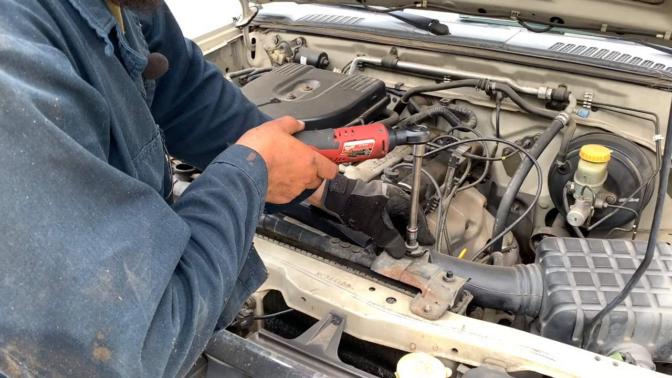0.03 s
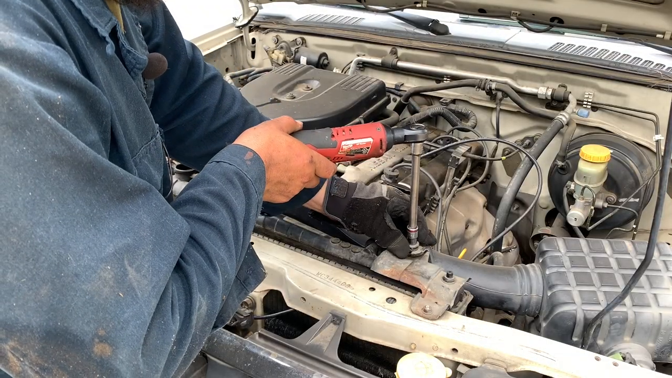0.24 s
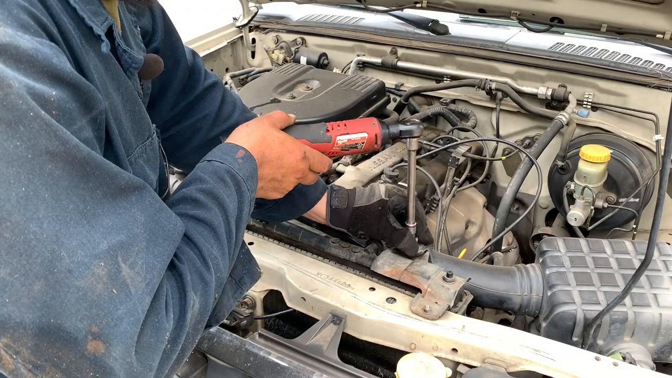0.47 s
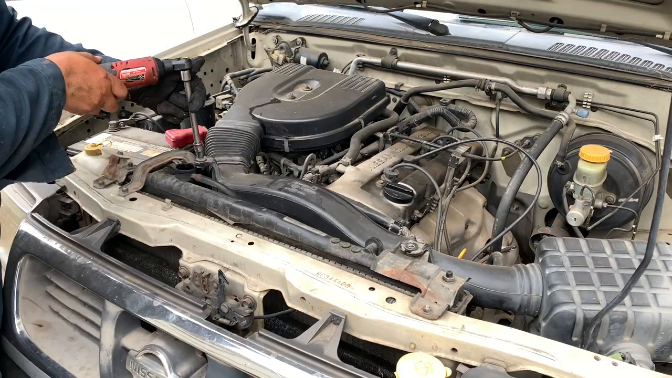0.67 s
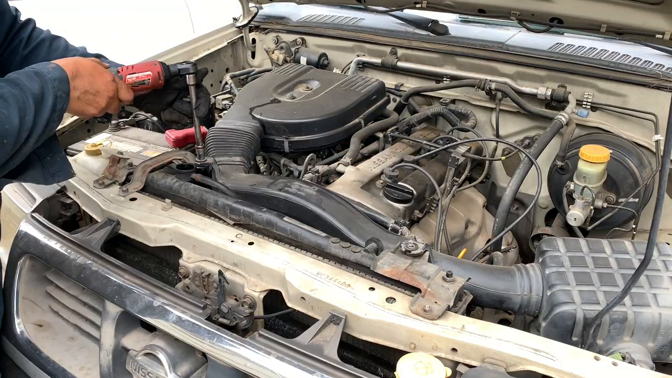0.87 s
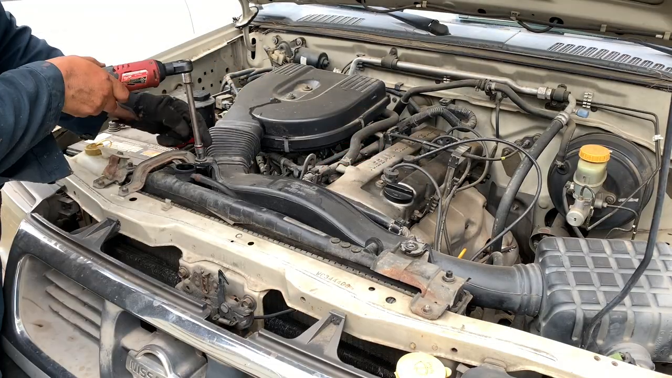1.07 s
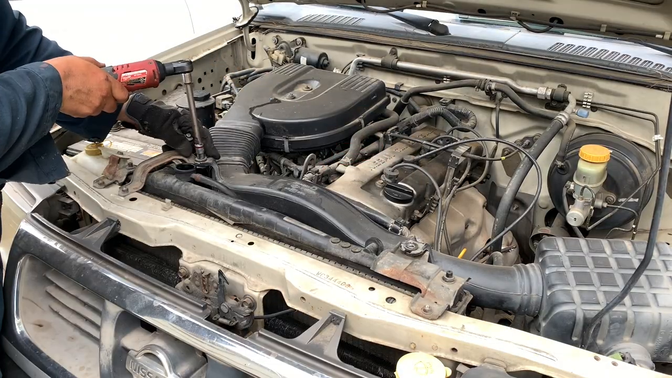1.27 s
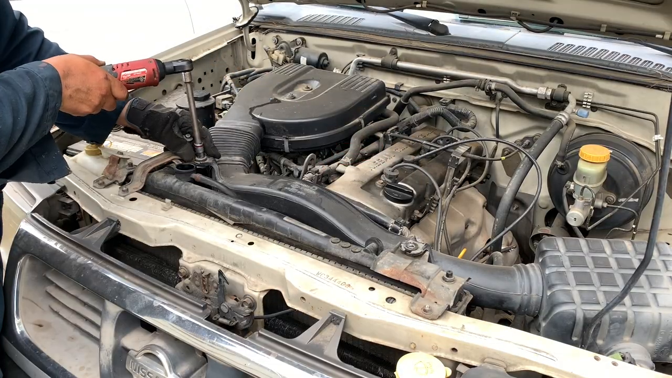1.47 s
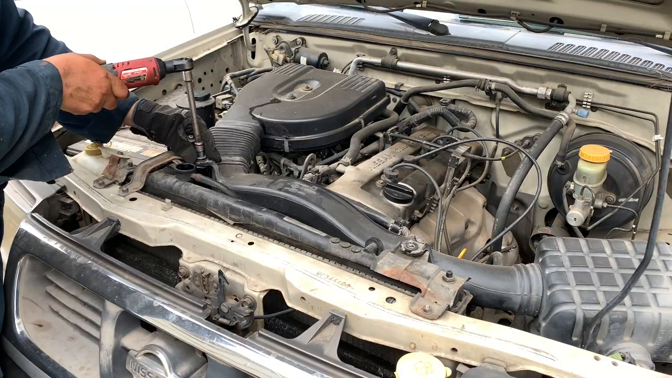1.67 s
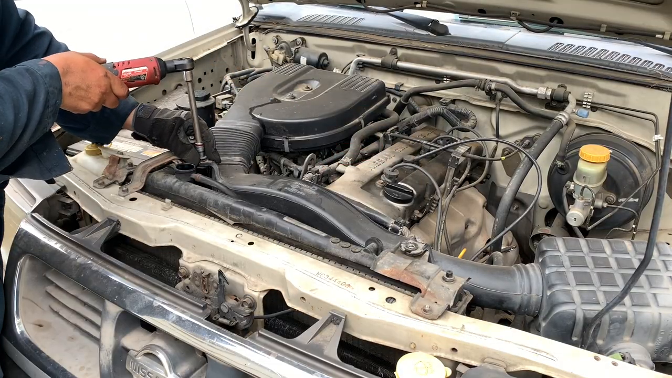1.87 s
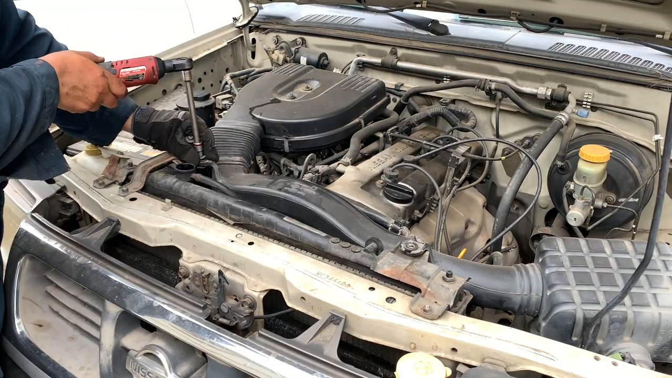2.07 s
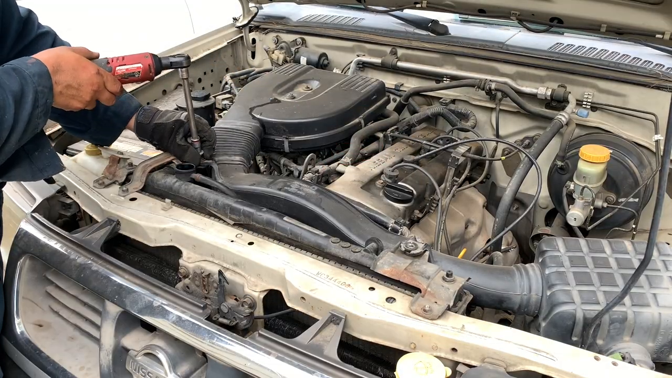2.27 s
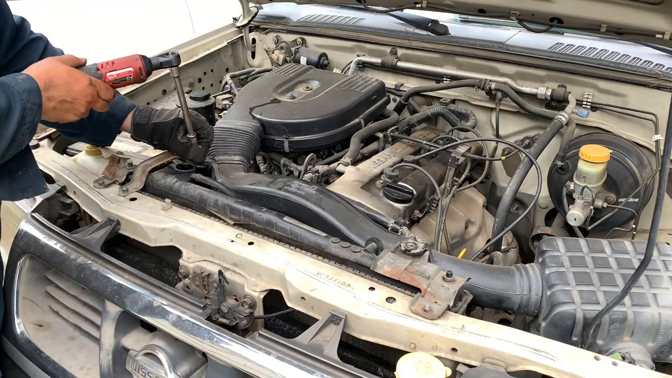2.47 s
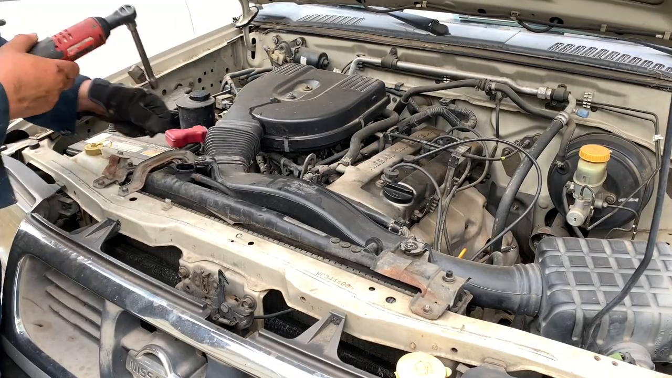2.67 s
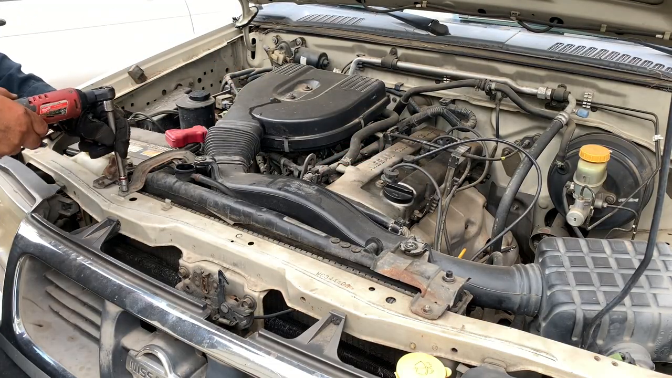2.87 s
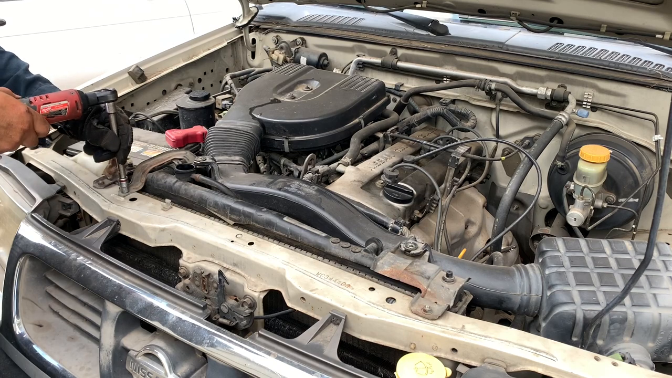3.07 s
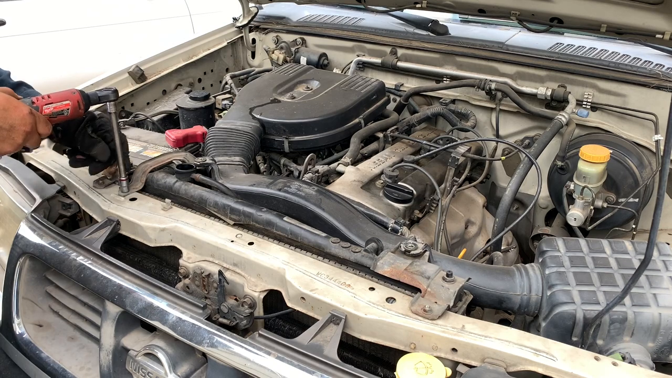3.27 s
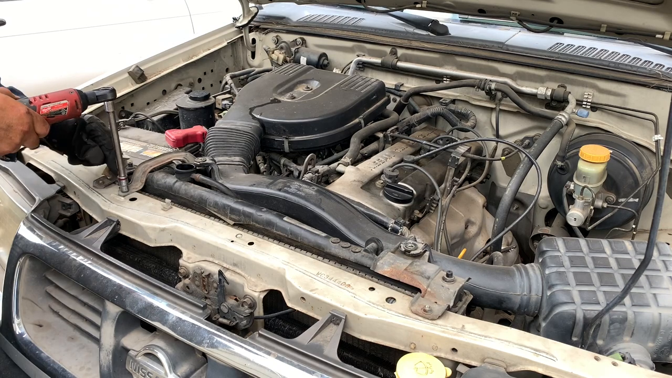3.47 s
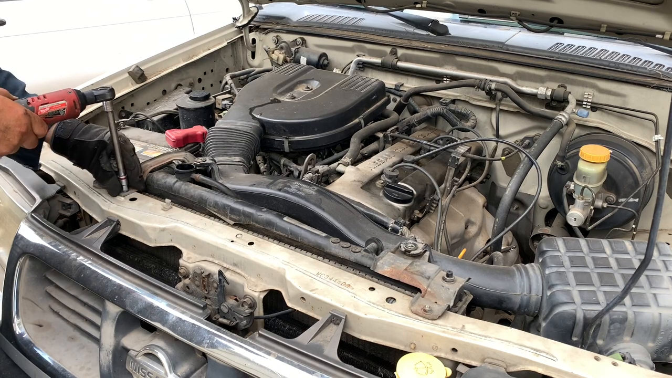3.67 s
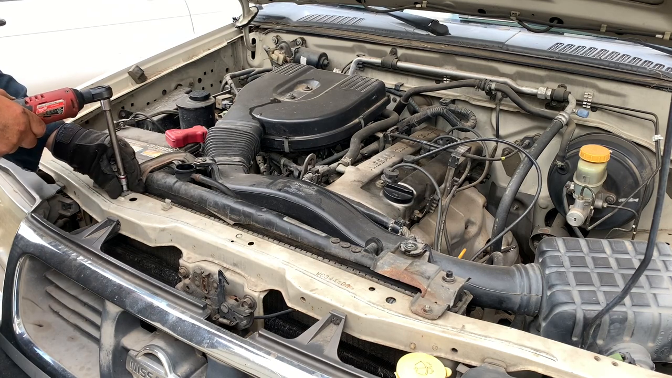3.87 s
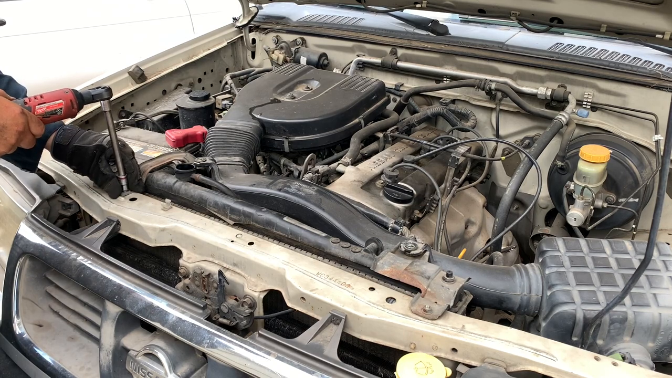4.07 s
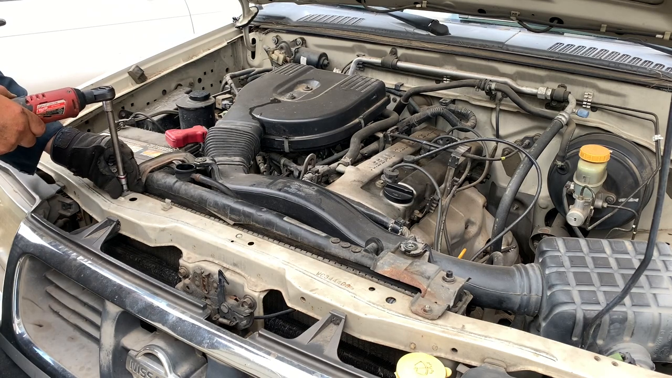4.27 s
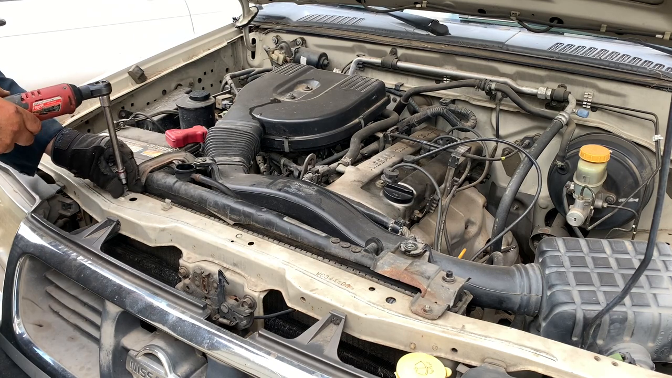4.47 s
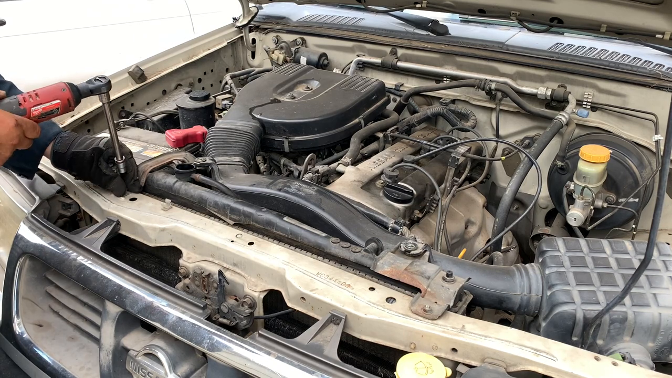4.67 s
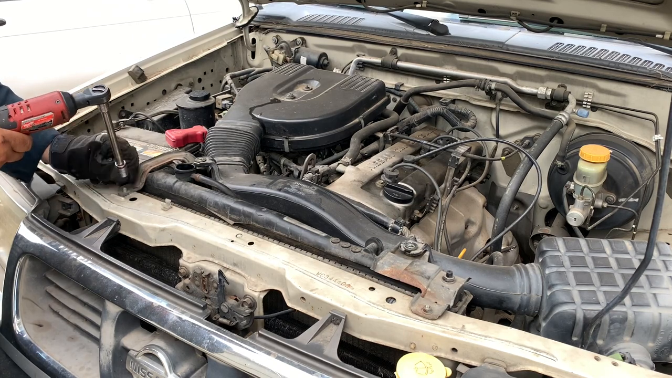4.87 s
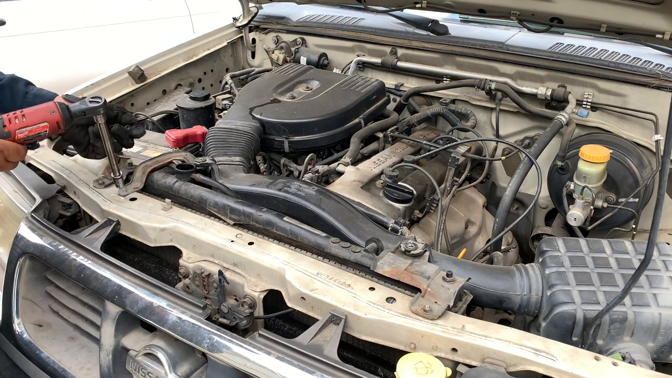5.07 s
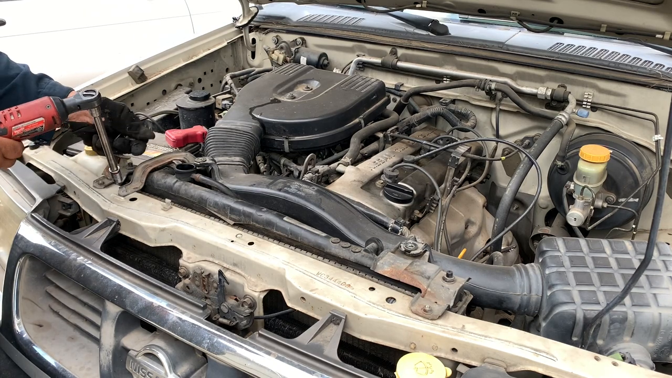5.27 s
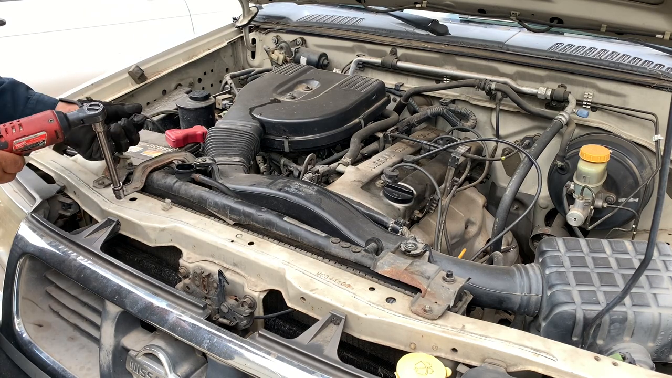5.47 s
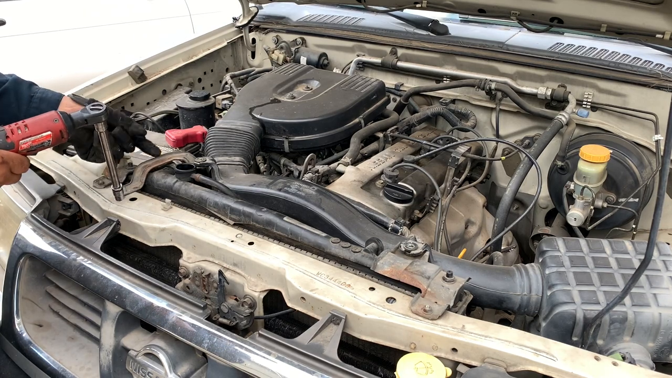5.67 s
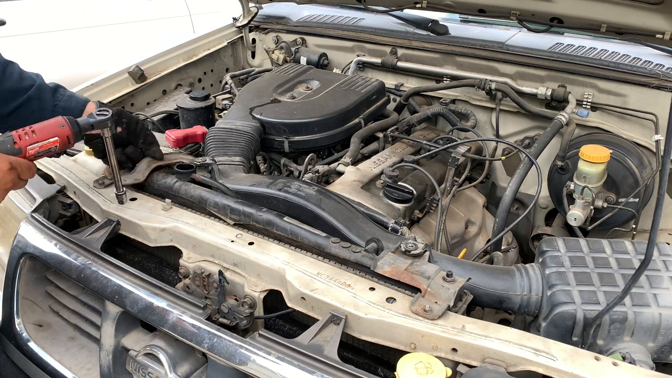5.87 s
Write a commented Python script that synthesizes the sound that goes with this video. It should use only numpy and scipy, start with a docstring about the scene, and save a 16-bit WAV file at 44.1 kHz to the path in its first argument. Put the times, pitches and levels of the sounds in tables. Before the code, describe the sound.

In a quiet garage, a cordless ratchet is already buzzing close to the microphone and soon winds down. After a knock and a clink, it bites with a sharp rattle and spins another bolt out. The socket clinks again, and a third burst rattles against the car's metal panel before coasting to a stop. Light ticks, clinks and a knock follow, with occasional low puffs of air on the microphone throughout.

```python
"""Cordless ratchet on a car's front panel

A cordless ratchet spins out bolts in three close bursts. Its pawl snaps twice per turn of the crank,
forcing the head and the panel to vibrate, and friction brings the motor to rest. Before the second and
third bursts the socket clinks, parts knock, the speed controller whines and a bolt clatters loose.
Puffs of air buffet the microphone over the soft rush of a quiet garage."""
import sys
import numpy as np
from scipy import signal
from scipy.fft import rfft, irfft, next_fast_len
from scipy.io import wavfile
from scipy.ndimage import uniform_filter1d, map_coordinates

SR = 44100
rng = np.random.default_rng(int(sys.argv[2]) if len(sys.argv) > 2 else 0)


def write(x):
    x = np.atleast_2d(x).T
    wavfile.write(sys.argv[1], SR, np.round(np.clip(x, -1, 1) * 32767).astype(np.int16))


N = 261513
T = np.arange(N) / SR
FULL_SPEED = 151.2  # crank turns per second

# Ring of the ratchet head, one spectrum per burst. Each point: frequency in Hz, relative level in dB.
HEAD_SPECTRA = [
    [(880, -28), (1500, -10.5), (1810, -4.5), (1970, -9), (2680, -6), (3320, -11), (4130, -1.5),
     (5280, -10), (6230, -10), (6950, -0.5), (9240, -7), (10500, -0.5), (11900, -7), (14900, -0.5),
     (15700, -4.5)],
    [(880, -38), (1500, -26), (1690, -6.5), (1970, -6), (2180, -2.5), (2550, -5.5), (2810, -4),
     (3170, -8.5), (4210, -0.5), (5540, -6.5), (8290, 0.5), (9890, -5), (12000, 0), (15100, -1.5),
     (15700, -5)],
    [(880, -39.5), (1500, -10), (1640, -10), (2200, -3), (2730, -6.5), (3200, -2), (3490, -6.5), (4050, -3),
     (4880, -2), (5760, -9.5), (8130, 0.5), (9060, -6.5), (10800, -2.5), (12300, -1.5), (15700, -7)],
]
# Spectrum of steel touching steel. Each row: frequency in Hz, relative level in dB.
STEEL_SPECTRUM = [(1200, -43.5), (2400, -2.5), (3400, 0), (4400, 0.5), (6000, -6.5), (9000, -33)]


def amp(db):
    """Amplitude ratio of a level in decibels."""
    return 10 ** (np.asarray(db) / 20)


def unit(x):
    """Normalisation to an rms of 1."""
    return x / np.sqrt(np.mean(x ** 2) + 1e-20)


def levelled(x, seconds=0.1):
    """Division by the running rms steadies the slow level and keeps the transients."""
    window = seconds * SR
    power = np.abs(uniform_filter1d(uniform_filter1d(x * x, int(window)), int(window / 2)))
    return x / np.sqrt(power + power.max() / 10 ** 4)


def wobble(rate):
    """Slow random modulation: a spline through `rate` Gaussian values a second."""
    values = rng.standard_normal(int(T[-1] * rate) + 4)
    grid = np.arange(0, T[-1] * rate + 1, 1 / 8)
    return np.interp(T * rate, grid, map_coordinates(values, [grid]))


def swells(rows):
    """Gaussian envelopes. Each row: centre in seconds, width in seconds, level in dB."""
    return sum(amp(db) * np.exp(-.5 * ((T - s) / width) ** 2) for s, width, db in rows)


def held(start, hold, db, rise, fall):
    """A plateau with exponential flanks, whose time constants are shares of the hold."""
    early, late = np.maximum(start - T, 0), np.maximum(T - start - hold, 0)
    return amp(db) * np.exp(-(early / rise + late / fall) / hold)


def filtered(x, response):
    """Linear filtering: the spectrum is multiplied by a frequency response."""
    size = 2 * next_fast_len(len(x) // 2 + 4096)
    hz = np.fft.rfftfreq(size, 1 / SR)
    return irfft(rfft(x, size) * response(hz), size)[:len(x)]


def colour(points):
    """Minimum-phase response through points of frequency in Hz and level in dB."""
    def response(hz):
        point_hz, db = np.transpose(points)
        gain = amp(np.interp(np.log(hz + 1), np.log(point_hz), db))
        cepstrum = irfft(np.log(gain))
        half = len(cepstrum) // 2
        return np.exp(rfft(np.r_[cepstrum[0], 2 * cepstrum[1:half], np.zeros(half)]))
    return response


def resonances(modes):
    """Modal superposition: damped resonators add with alternating sign."""
    return lambda f: sum((-1) ** k * amp(db) * 1j * f * width / (hz * hz - f * f + 1j * f * width)
                         for k, (hz, width, db) in enumerate(modes))


def noise(spectrum):
    """White noise shaped to a spectrum, with an rms of 1."""
    return unit(filtered(rng.standard_normal(N), colour(spectrum)))


def air_puffs():
    """Turbulent pressure on the microphone: small eddies grow faster, so strong puffs flutter higher."""
    # Puffs of air. Each row: start in seconds, hold in seconds, level in dB.
    puffs = [(0.228, 0.043, -42), (0.339, 0.024, -35), (0.435, 0.13, -56), (0.647, 0.016, -53),
             (0.86, .06, -54.5), (1.105, 0.072, -36.5), (1.942, .11, -47), (2.726, 0.036, -57),
             (3.054, .035, -41.5), (3.16, .2, -61.5), (3.51, .09, -37.5), (3.88, 0.16, -52),
             (4.5, 0.065, -29.5), (5.545, 0.088, -54)]
    # Spectra of the puff and its small eddies. Each row: frequency in Hz, relative level in dB.
    puff_spectrum = [(12, -27.5), (22, -8), (40, 4), (65, -3), (100, -9), (150, -25), (300, -57)]
    eddy_spectrum = [(40, -24), (70, 8.5), (110, -2), (160, -6.5), (240, -27), (400, -62.5)]
    draught = amp(-72.5)
    flow = draught + np.max([held(*puff, rise=.21, fall=.75) for puff in puffs], axis=0)
    buffet = flow * levelled(noise(puff_spectrum), seconds=.024)
    eddies = amp(5) * flow ** 1.38 * levelled(noise(eddy_spectrum), seconds=.024)
    return buffet + eddies


def garage():
    """Ambient noise: a low, broadband rush whose level wanders."""
    # Course of the ambient level. Each row: time in seconds, level in dB.
    levels = [(0, -61.5), (2.7, -62), (3, -62.5), (4.7, -60.5), (5, -68.5), (5.9, -64.5)]
    # Spectrum of the rush. Each row: frequency in Hz, relative level in dB.
    spectrum = [(30, -11.5), (60, -5.5), (130, -4), (370, -5), (600, -8), (900, -12.5), (1400, -16),
                (2500, -22.5), (4500, -27.5), (6000, -31), (15500, -34)]
    level_db = np.interp(T, *np.transpose(levels)) + 1.1 * wobble(9.7)
    return amp(level_db) * noise(spectrum)


def crank(start, release, coast, load_sag=.33, spin_up_s=.06):
    """Turns per second: the motor recovers from its load, then friction slows it almost evenly."""
    driven = 1 - load_sag * np.exp(-np.maximum(T - start, 0) / spin_up_s)
    coasting = np.clip(1 - (T - release) / coast, .05, 1) ** 1.14
    return FULL_SPEED * driven * coasting


def strikes(turns, running, offset, jitter_s, scatter_db):
    """A quasi-periodic impulse train: one blow per turn, a little uneven in time and size."""
    at = np.flatnonzero((np.diff(np.floor(turns - offset)) > 0) & running[1:])
    late, size = rng.standard_normal((len(at), 2)).T
    at = np.clip(at + np.round(late * jitter_s * SR).astype(int), 0, N - 1)
    return np.bincount(at, amp(scatter_db * size), N)


def rattle(blows, t60, bay_db, bay_t60):
    """Double-slope decay: each blow starts a short dense ring and a weaker tail in the engine bay."""
    t = np.arange(SR // 5) / SR
    decay = amp(-60 * t / t60) ** 2 + amp(bay_db - 60 * t / bay_t60) ** 2
    energy = np.abs(signal.fftconvolve(blows ** 2, decay)[:N])
    return np.sqrt(energy) * rng.standard_normal(N)


def reflections(x, level_db, count=7):
    """Early reflections from nearby sheet metal join the sound, swelling and fading as the tool sways."""
    delays = (rng.uniform(.0005, .009, count) * SR).astype(int)
    return x + amp(level_db) * sum(wobble(3) * np.pad(x, (d, 0))[:N] for d in delays)


def motor_hum(turns):
    """Rotation gives a tone at the crank rate, which swells as the last bolt runs free."""
    level = amp(-68) + held(start=3.86, hold=.36, db=-54.5, rise=.15, fall=.25)
    return level * amp(3.3 * wobble(25)) * np.sin(2 * np.pi * turns + .73 * wobble(23))


def burst(pull, strength, head_spectrum, panel_spectrum):
    """Forced vibration: the pawl's periodic impacts drive the head, the panel and the extension bar."""
    # Modes of the extension bar. Each row: frequency in Hz, bandwidth in Hz, relative level in dB.
    bar_modes = [(724, 27, -8.5), (914, 40, -6.5), (1196, 28, -7.5), (2280, 550, -19), (3260, 76, -5),
                 (4133, 520, -10.5), (6010, 150, -6.5), (7440, 800, -13)]
    start, release, coast, stop = pull
    attack_s = .004  # the drive takes up its play
    running = (T > start - 5 * attack_s) & (T <= stop)
    gate = uniform_filter1d(running * np.exp(-np.maximum(start - T, 0) / attack_s), 100)
    rate = crank(start, release, coast)
    turns = np.cumsum(rate * (1 + .011 * wobble(25))) / SR

    full_pawl_db, full_panel_db, full_bar_db, loss_db = strength
    octaves = np.log2(rate / FULL_SPEED)  # each level gains a set number of dB as the speed doubles
    turns_undone = FULL_SPEED * max(-start, 0) + np.cumsum(rate * running) / SR
    slack_db = loss_db * (turns_undone / 170) ** 2.16  # a loosened bolt passes on less vibration
    grip_db = 22 * np.exp(-turns_undone / 5)  # a tight bolt damps the bar
    unload_db = .8 * np.clip((T - release) / .08, 0, 1)  # the pawl relaxes on release
    pawl_db = full_pawl_db + 9.5 * octaves - unload_db
    panel_db = full_panel_db + 4 * octaves - slack_db
    bar_db = full_bar_db + 22 * octaves - slack_db - grip_db + 2 * wobble(13)

    snap = strikes(turns, running, offset=0, jitter_s=.00009, scatter_db=1.7)
    rebound = strikes(turns, running, offset=.3, jitter_s=.00011, scatter_db=1.5)
    drag = strikes(turns, running, offset=.15, jitter_s=.0008, scatter_db=3.5)
    # The finer rattle of the gear teeth stands out as the slowing pawl snaps more gently.
    teeth = strikes(7 * turns, running, offset=0, jitter_s=.0006, scatter_db=3)
    vigour = (rate / FULL_SPEED) ** .25
    blows = vigour * (snap + .7 * rebound + .6 * drag) + .22 * teeth

    clatter = reflections(rattle(blows, t60=.0051, bay_db=-7.5, bay_t60=.054), level_db=-18.5)
    head = amp(pawl_db) * levelled(filtered(clatter, colour(head_spectrum)))
    # Panel and bar follow the beat of the pawl, so they buzz on harmonics of the crank rate.
    shake = unit(snap) + 1.42 * unit(rattle(blows, t60=.029, bay_db=-1.5, bay_t60=.15))
    panel = amp(panel_db) * levelled(filtered(shake, colour(panel_spectrum)))
    bar = amp(bar_db) * levelled(filtered(shake, resonances(bar_modes)))
    return gate * (head + panel + bar + motor_hum(turns))


def ratchet():
    """Source and filter: one mechanism meets a different response of head and panel at each bolt."""
    # Trigger pulls. Each row: start, release, coasting time and end of the sound, all in seconds.
    pulls = [(-.5, .425, 0.49, .675), (.847, 2.121, 0.46, 2.412), (3.036, 4.369, .45, 4.762)]
    # Burst strengths. Each row: pawl, panel and bar levels at full speed, before losses, and the
    # loss of shaking after 170 crank turns, all in dB.
    strengths = [(-26.5, -40, -62, 14.5), (-28, -42, -60, 6), (-29, -39, -32.5, 10)]
    # Response of the panel, one spectrum per bolt. Each point: frequency in Hz, relative level in dB.
    panel_spectra = [
        [(150, -52), (250, -15.5), (284, -24), (353, -26), (456, 4), (506, -3.5), (614, 3.5), (692, 0),
         (793, 7), (962, -4), (1070, 6.5), (1300, -8.5), (1700, -7.5), (2210, -43), (3740, -120)],
        [(150, -45), (250, -15), (301, -5.5), (408, -15), (460, 0), (540, -11), (604, 1), (692, -3), (895, 6.5),
         (977, -4.5), (1050, 5), (1450, -1.5), (1700, 1), (2210, -33.5), (3740, -120)],
        [(150, -55.5), (250, -17.5), (408, -12.5), (456, -5.5), (536, -10), (604, -2.5), (687, -10),
         (732, -7.5), (888, 0.5), (1110, -8.5), (1180, 5.5), (1290, -2.5), (1700, -5), (2210, -37),
         (3740, -120)],
    ]
    return sum(burst(*parts) for parts in zip(pulls, strengths, HEAD_SPECTRA, panel_spectra))


def hits(times, dbs, response, t60, bay_db, bay_t60):
    """Impact excitation: decaying noise bursts pass through a body's response, scaled to unit energy."""
    blows = np.bincount(np.round(times * SR).astype(int), amp(dbs), N)
    impulse_response = filtered(np.r_[1., np.zeros(SR // 4)], response)
    return filtered(rattle(blows, t60, bay_db, bay_t60), response) / np.linalg.norm(impulse_response)


def socket_ring(times, dbs):
    """Free vibration: every contact rings the socket's damped modes at new strengths."""
    # Socket modes. Each row: frequency in Hz, relative level in dB, time to fall 60 dB in seconds.
    modes = [(1880, -5, 0.15), (2290, -7.5, 0.11), (2506, -5.5, .06), (3230, 8, 0.04), (3420, 6, 0.046),
             (4270, 0, 0.11), (4450, -7, 0.074), (11000, -4, 0.069)]
    hz, level_db, t60 = np.transpose(modes)[:, :, None]
    t = np.arange(SR // 5) / SR
    onset = 1 - np.exp(-t / .000694)
    out = np.zeros(N + len(t))
    for s, db in zip(times, dbs):
        strength, detune, phase = rng.standard_normal((3, len(modes), 1))
        decays = amp(level_db + 2 * strength - 60 * t / t60)
        tones = np.sin(2 * np.pi * (hz * (1 + detune / 200) * t + phase))
        out[round(s * SR):][:len(t)] += amp(db) * (decays * tones).sum(0) * onset
    return out[:N]


def contacts(rows, clack_db, knock_db, tick_db, ring_db):
    """One impact excites several bodies: steel clacks and ticks, a part knocks, the socket rings."""
    # Spectra of the dull knock and the bright tick. Each row: frequency in Hz, relative level in dB.
    knock_spectrum = [(250, -22), (650, -5), (1100, 1), (1450, -9.5), (1900, 0), (2500, -18), (5000, -46.5)]
    tick_spectrum = [(4000, -35), (7000, 4.5), (11500, 2.5), (16000, -1)]
    s, db = np.transpose(rows)
    clack = hits(s, db + clack_db, colour(STEEL_SPECTRUM), t60=.015, bay_db=-18, bay_t60=.11)
    knock = hits(s, db + knock_db, colour(knock_spectrum), t60=.07, bay_db=-14.5, bay_t60=.16)
    tick = hits(s, db + tick_db, colour(tick_spectrum), t60=.026, bay_db=-18, bay_t60=.11)
    return clack + knock + tick + socket_ring(s, db + ring_db)


def handling():
    """Impacts of different timbre, with sliding friction as the socket seats."""
    # The socket meets steel, handled parts knock, the loose socket and the trigger tick.
    # Each row: time in seconds, base level in dB.
    socket_clinks = [(0.7268, -52), (2.863, -49.5), (2.868, -37), (5.7185, -52.5), (5.8728, -45),
                     (5.8786, -38)]
    part_knocks = [(.729, -42.5), (.792, -59), (2.6915, -60.5), (5.7046, -54), (5.8052, -57.5),
                   (5.906, -42.5)]
    light_ticks = [(.728, -36), (.773, -53), (.7804, -51), (2.797, -47.5), (2.9797, -49), (3.0036, -63),
                   (4.815, -48.5), (5.102, -57.5), (5.1503, -61), (5.3674, -65)]
    clinks = contacts(socket_clinks, clack_db=-3.5, knock_db=-13.5, tick_db=-8.5, ring_db=-16)
    knocks = contacts(part_knocks, clack_db=-8.5, knock_db=-1.5, tick_db=-19, ring_db=-17)
    ticks = contacts(light_ticks, clack_db=-5.5, knock_db=-30.5, tick_db=-4.5, ring_db=-25)
    lead_s, width_s, slide_db = .0028, .0048, -21.5
    sliding = swells([(s - lead_s, width_s, db + slide_db) for s, db in socket_clinks])
    return clinks + knocks + ticks + sliding * noise(STEEL_SPECTRUM)


def controller_whine(width_s=.01):
    """Switched motor current sings on a harmonic series for an instant before the crank moves."""
    # Squeezes of the trigger. Each row: time in seconds, base level in dB.
    squeezes = [(0.825, -52.5), (3.023, -67.5)]
    # Switching harmonics. Each row: frequency in Hz, relative level in dB.
    harmonics = [(3740, -4), (7480, -5.5), (11220, -5)]
    tone = sum(amp(db) * np.sin(2 * np.pi * hz * T + .78 * wobble(500)) for hz, db in harmonics)
    return swells([(s, width_s, db) for s, db in squeezes]) * tone


def bolt_jolts(blow_gap_s=.009, scatter_db=2):
    """Impulsive loading: the socket hammers the bolt, the panel thuds and the pawl snaps hard."""
    # Runs of blows that break a bolt loose. Each row: start and length in seconds, then ring level,
    # thud level and growth over the run in dB.
    runs = [(0.847, .04, -25, -30, -4.5), (.92, .005, -30, -35, 0), (3.049, .06, -23.5, -30.5, 2)]
    # Spectra of the steel's ring and the panel's thud. Each row: frequency in Hz, relative level in dB.
    ring_spectrum = [(820, -28.5), (1400, -3), (2260, -6.5), (2740, -8), (3160, -3), (6080, -12.5),
                     (8330, -9.5), (10100, -19), (15100, -23.5), (16000, -9.5)]
    thud_spectrum = [(30, -17), (70, -14.5), (200, -10), (330, -12.5), (460, -1.5), (650, -2.5), (860, 4.5),
                     (1200, -3), (1500, -17), (2200, -39)]
    # Snaps of the pawl as it bites or comes to rest, and blows that ring the freed bolt.
    # Each row: time in seconds, level in dB.
    pawl_snaps = [(0.8494, -14), (0.85, -28), (2.4499, -32.5), (3.037, -20), (4.6503, -28), (4.6753, -29),
                  (4.7061, -45), (4.7326, -40), (4.753, -38)]
    bolt_blows = [(0.872, -25), (.882, -27)]
    # Modes of the freed bolt. Each row: frequency in Hz, bandwidth in Hz, relative level in dB.
    bolt_modes = [(2264, 130, 6), (3220, 140, -17)]
    blows = [(start + beat, ring + growth * beat / length, thud + growth * beat / length)
             for start, length, ring, thud, growth in runs
             for beat in np.arange(0, length, blow_gap_s)]
    s, ring_db, thud_db = np.transpose(blows)
    uneven_db = scatter_db * rng.standard_normal(len(s))
    ring = hits(s, ring_db + uneven_db, colour(ring_spectrum), t60=.015, bay_db=-5.5, bay_t60=.082)
    thud = hits(s, thud_db + uneven_db, colour(thud_spectrum), t60=.072, bay_db=-17, bay_t60=.12)
    snap = hits(*np.transpose(pawl_snaps), colour(HEAD_SPECTRA[1]), t60=.0085, bay_db=-18.5, bay_t60=.061)
    bolt = hits(*np.transpose(bolt_blows), resonances(bolt_modes), t60=.043, bay_db=-25.5, bay_t60=.058)
    return ring + thud + snap + bolt


def glove_rustle(grain_db=3, grains_per_s=90):
    """Stick-slip friction: the glove's fabric catches and slips on the tool, giving a grainy hiss."""
    # Brushes of the glove. Each row: centre in seconds, width in seconds, level in dB.
    brushes = [(2.63, 0.052, -81.5), (5.24, .04, -75.5), (5.56, 0.04734, -80)]
    # Spectrum of the fabric. Each row: frequency in Hz, relative level in dB.
    spectrum = [(1500, -9.5), (4000, 7), (6000, -4), (8000, 9), (10000, -3), (15000, 5)]
    grain = amp(grain_db * wobble(grains_per_s))
    return swells(brushes) * unit(grain * noise(spectrum))


def scene():
    """Superposition of the tool, its handling and a background whose level dips briefly twice."""
    tool = ratchet() + bolt_jolts() + handling() + glove_rustle() + controller_whine()
    dip_times, dip_width_s, dip_db = (.686, 2.846), .0062, -14
    dips = amp(dip_db * swells([(s, dip_width_s, 0) for s in dip_times]))
    background = (air_puffs() + garage()) * dips
    return (tool + background)[None]


def record(dry, cutoff_hz=15830, edge_hz=160):
    """Band limiting: a low-pass with a raised-cosine edge removes the highest treble."""
    def low_pass(hz):
        edge = np.clip((cutoff_hz - hz) / edge_hz + .5, 0, 1)
        return np.sin(np.pi / 2 * edge) ** 2
    return np.array([filtered(x, low_pass) for x in dry])


dry = scene()
out = record(dry)
write(out)
```